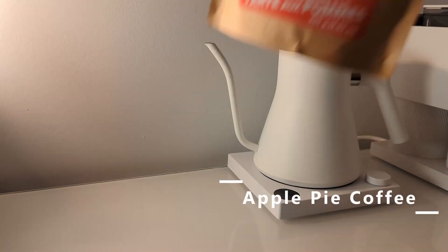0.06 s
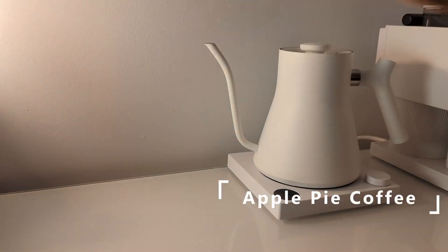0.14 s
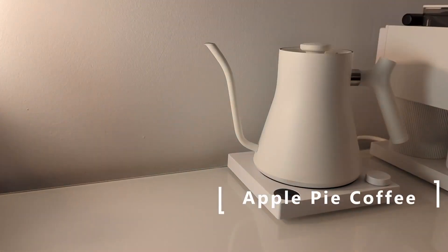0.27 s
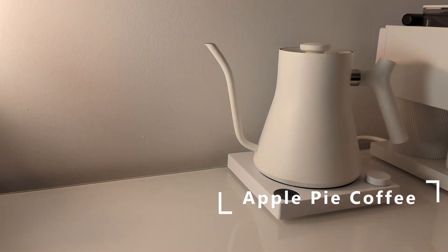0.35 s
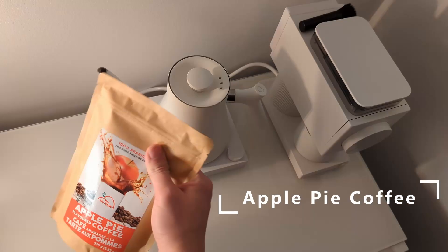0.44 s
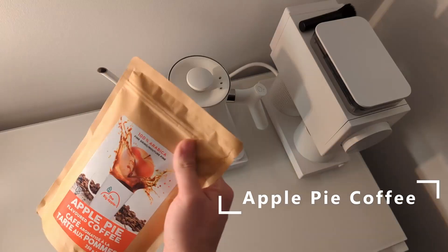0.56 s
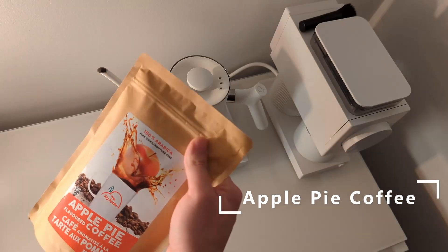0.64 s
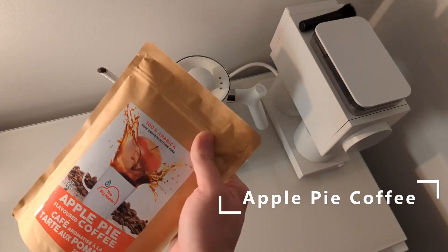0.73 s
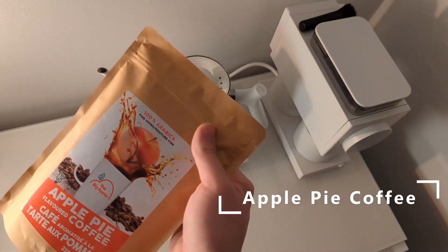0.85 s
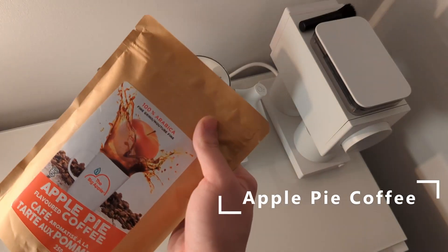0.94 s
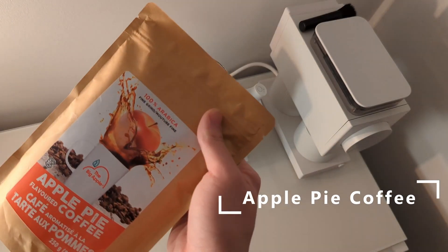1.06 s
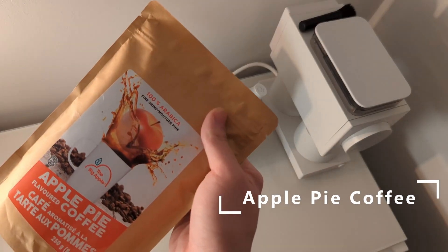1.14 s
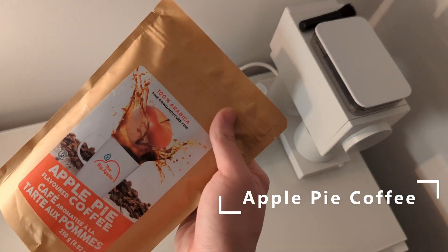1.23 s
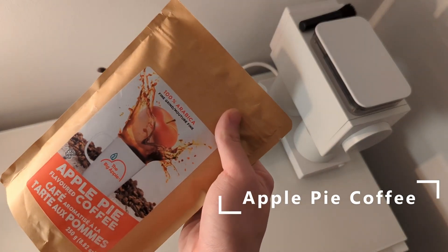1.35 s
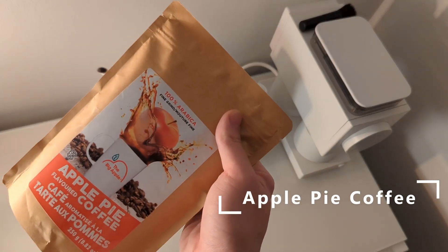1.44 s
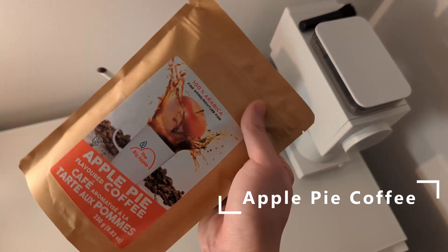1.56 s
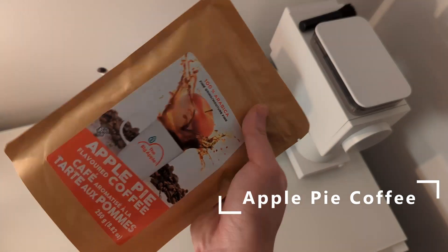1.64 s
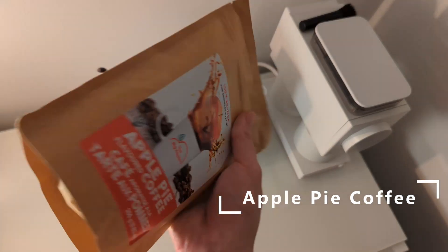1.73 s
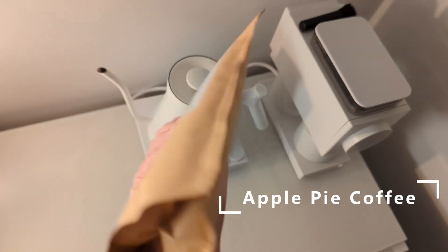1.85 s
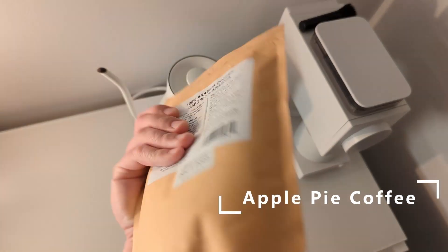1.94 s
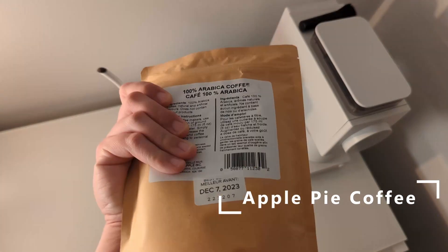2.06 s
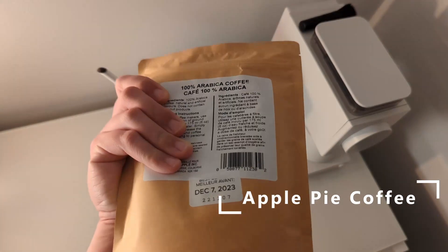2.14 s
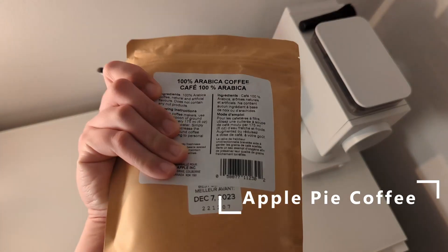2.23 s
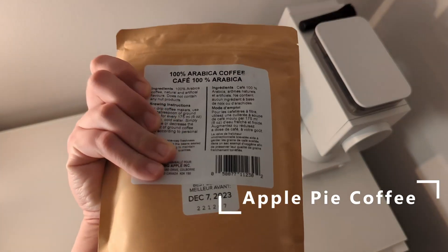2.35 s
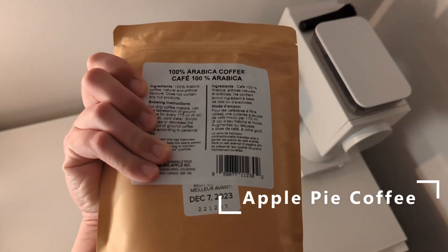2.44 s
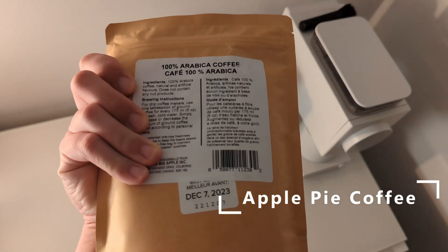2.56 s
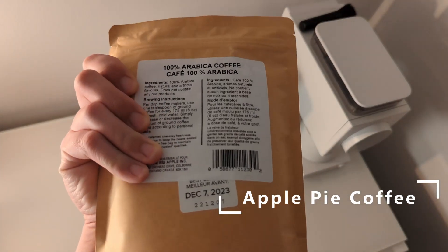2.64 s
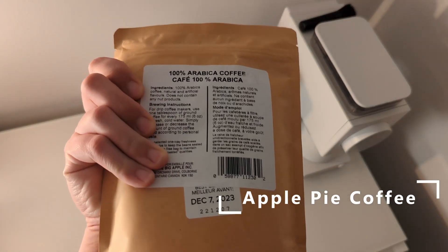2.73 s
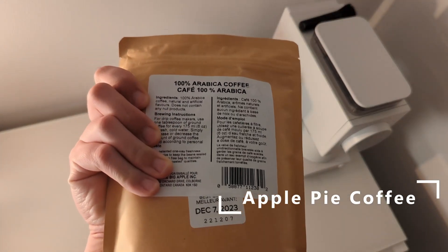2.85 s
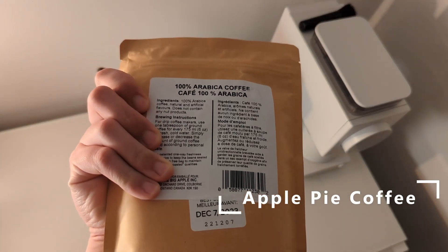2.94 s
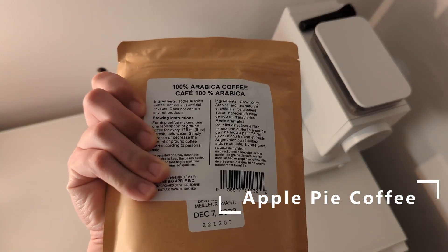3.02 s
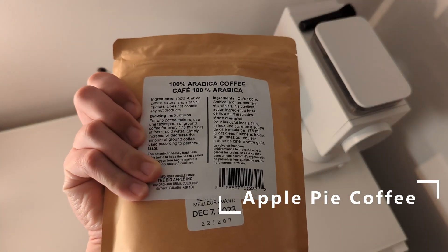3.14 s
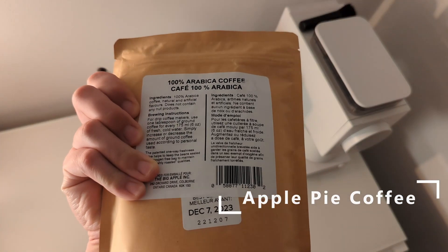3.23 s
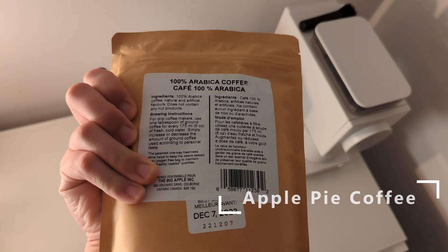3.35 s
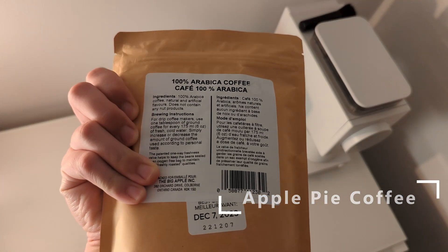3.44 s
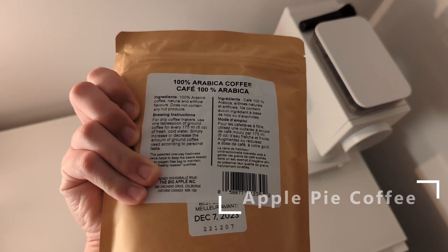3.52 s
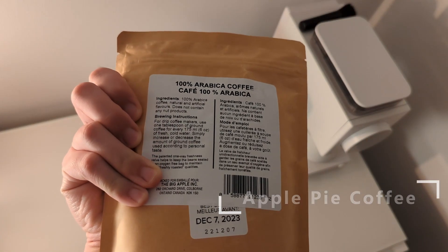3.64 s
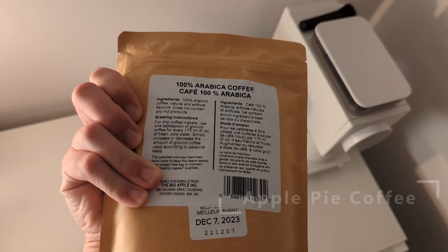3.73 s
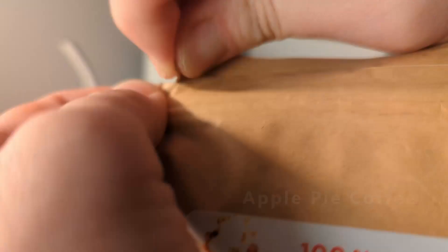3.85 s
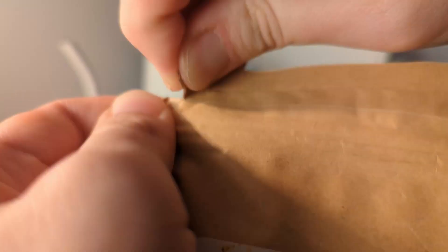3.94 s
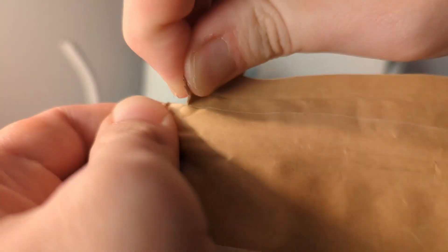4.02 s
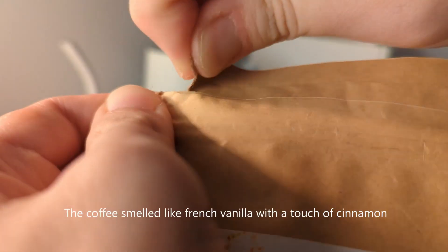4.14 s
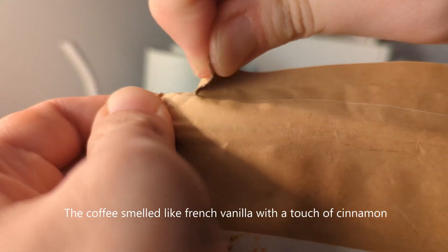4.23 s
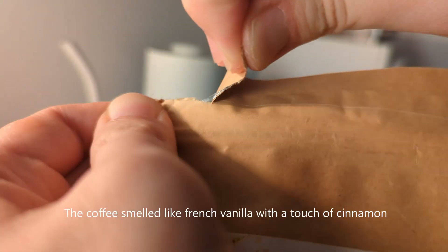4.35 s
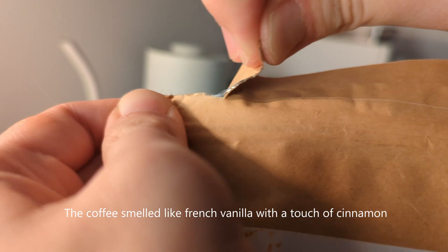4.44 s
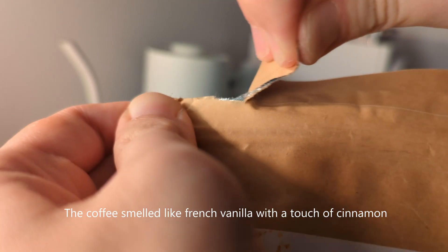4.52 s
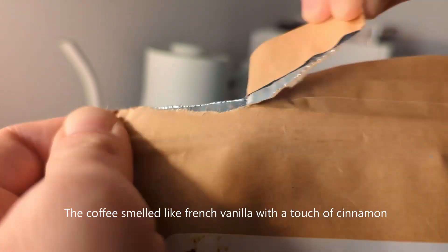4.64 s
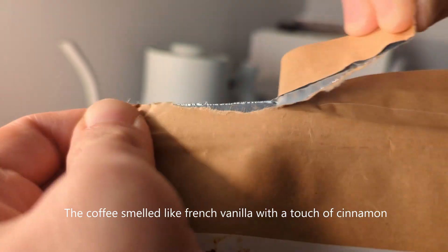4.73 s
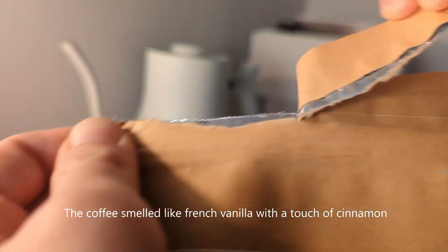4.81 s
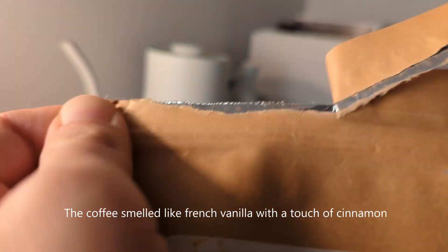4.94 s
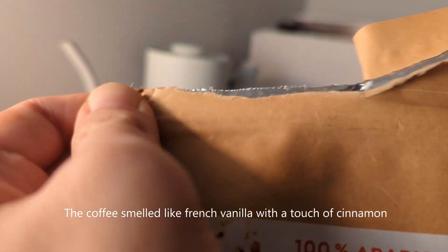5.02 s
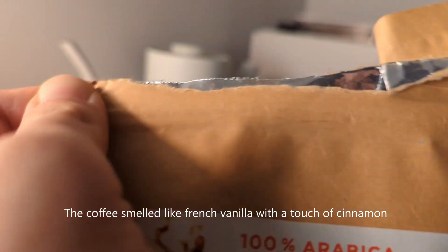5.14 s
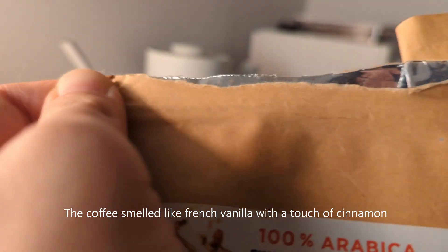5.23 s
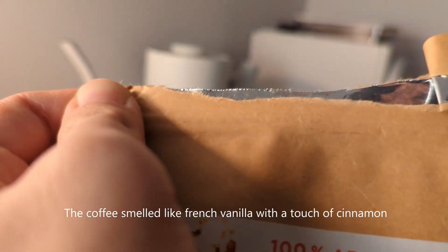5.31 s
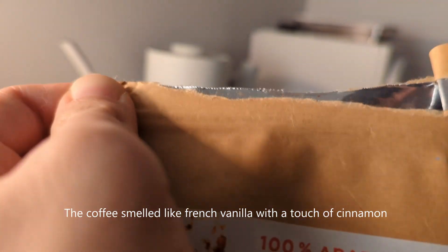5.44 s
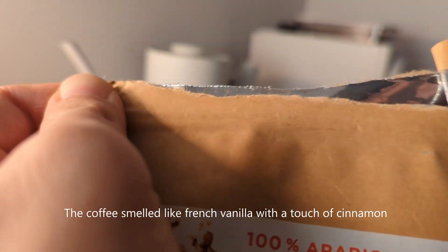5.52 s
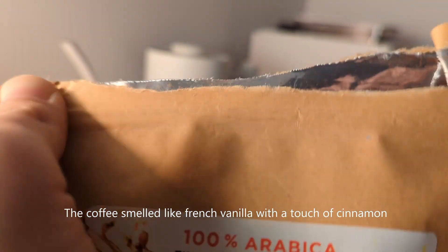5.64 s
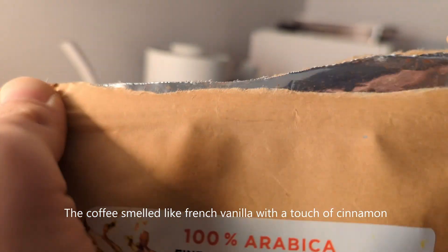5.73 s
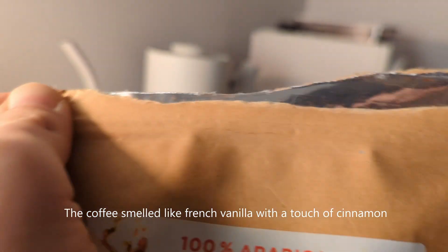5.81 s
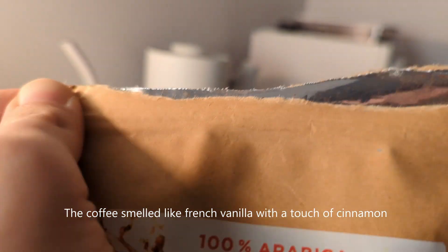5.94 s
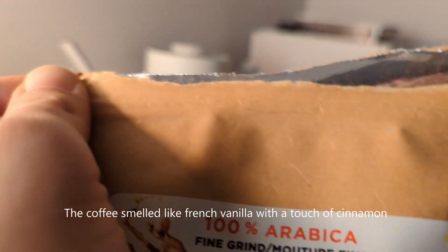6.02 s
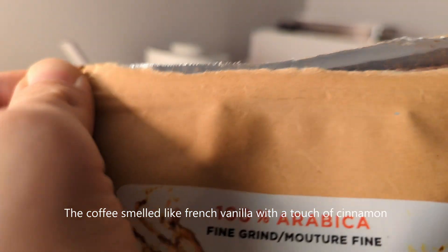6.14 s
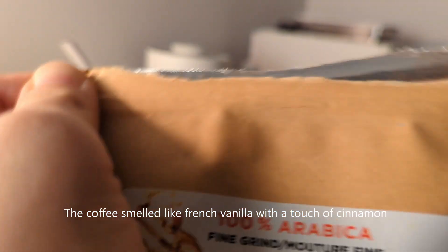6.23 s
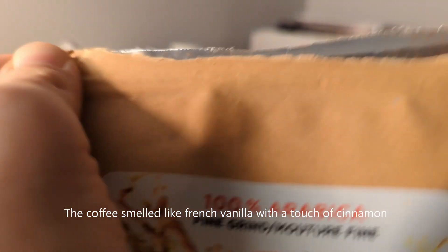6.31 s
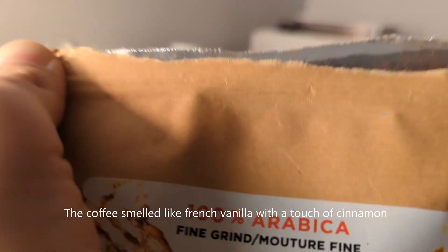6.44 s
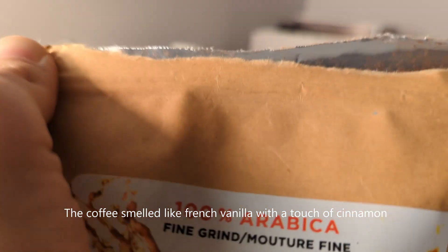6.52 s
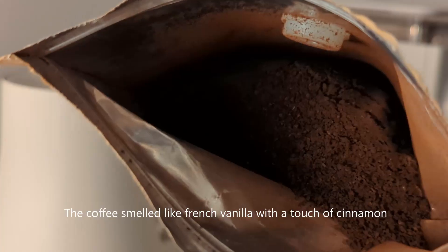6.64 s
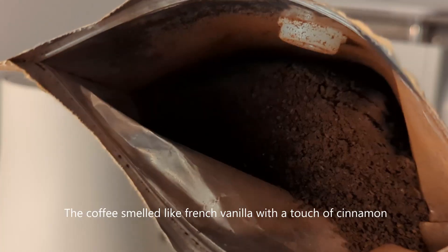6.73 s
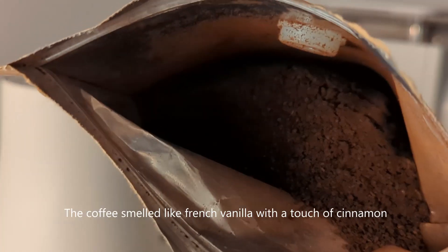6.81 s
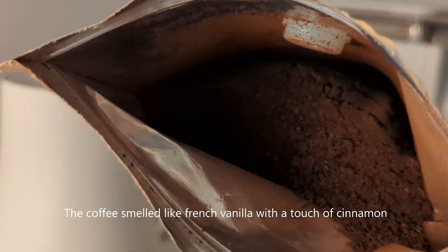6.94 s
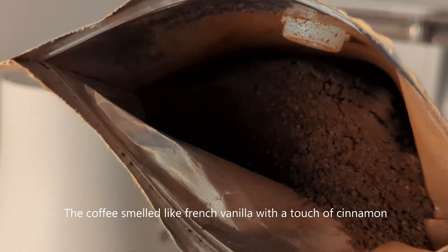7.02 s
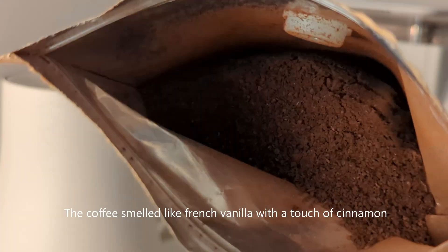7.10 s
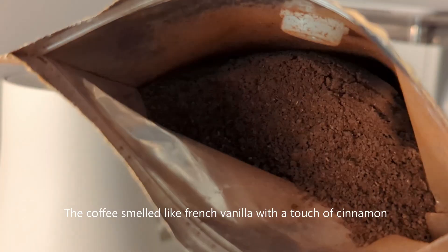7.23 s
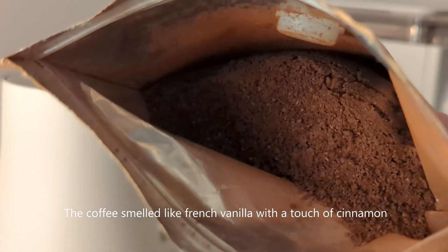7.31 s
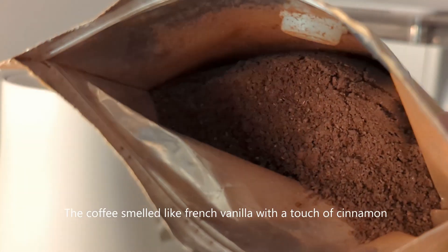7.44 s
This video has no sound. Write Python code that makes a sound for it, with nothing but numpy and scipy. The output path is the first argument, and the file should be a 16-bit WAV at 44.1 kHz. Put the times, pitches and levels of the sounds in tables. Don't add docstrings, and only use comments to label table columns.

```python
import sys
import numpy as np
from scipy import signal
from scipy.fft import rfft, irfft, next_fast_len
from scipy.io import wavfile
from scipy.ndimage import uniform_filter1d

SR = 44100
rng = np.random.default_rng(int(sys.argv[2]) if len(sys.argv) > 2 else 0)


def rack_gain(trim_db):
    fader = np.asarray(trim_db, float)
    return 10 ** (fader / 20)


def output_pcm(signal):
    pcm = np.clip(np.atleast_2d(signal).T, -1, 1) * 32767
    wavfile.write(sys.argv[1], SR, np.round(pcm).astype(np.int16))


N = 329443
T = np.arange(N) / SR

SHOT_STARTS = [
    0,
    .52,
    3.887,
    6.637,
]


def level(x, db):
    return x * rack_gain(db) / np.sqrt(np.mean(x ** 2))


def ring(x, hz, width):
    return signal.lfilter(*signal.iirpeak(min(hz, 0.45 * SR), hz / width, SR), x)


def colour(x, shape):
    hz, db = np.transpose(shape)
    size = next_fast_len(len(x), real=True)
    log_hz = np.log(np.fft.rfftfreq(size, 1 / SR) + 1)
    gain = rack_gain(np.interp(log_hz, np.log(hz), db, left=-70, right=-70))
    return irfft(rfft(x, size) * gain, size)[:len(x)]


def walk(rate):
    hold = int(SR / rate)
    steps = np.repeat(rng.standard_normal(N // hold + 1), hold)
    return uniform_filter1d(uniform_filter1d(steps, hold), hold)[:N]


def fibres(per_s, spread_db, smooth):
    snaps = rng.random(N) < per_s / SR
    loudness = rack_gain(spread_db * np.minimum(rng.exponential(size=N), 3))
    sign = np.sign(rng.standard_normal(N))
    return level(snaps * loudness * sign, 0) + smooth * rng.standard_normal(N)


def strokes(rows, fade_s):
    wall_linger = 1.1
    foil, wall = np.zeros(N), np.zeros(N)
    for s, swell_s, hold_s, db, wall_db in rows:
        begin = max(int((s - 4 * swell_s) * SR), 0)
        near = slice(begin, int((s + hold_s + 4 * fade_s) * SR))
        early = np.maximum(s - T[near], 0) / swell_s
        late = np.maximum(T[near] - s - hold_s, 0) / fade_s
        foil[near] += rack_gain(db - 20 * (early + late)) ** 2
        wall[near] += rack_gain(db + wall_db - 20 * (early + late / wall_linger)) ** 2
    return foil, wall


def hands():
    # full at in seconds, swell in seconds per 20 dB, hold in seconds,
    # foil level in dB, paper wall over foil in dB.
    slides = [(.15, .25, .15, -89, 0.1), (.553, .025, .06, -74, -4), (.622, .06, .03, -70, 13),
              (.80, .1, .11, -88, 0.1), (.905, .006, .006, -88, 14), (1.229, .005, .015, -95, 23),
              (1.303, .008, .03, -80, 6), (1.635, .03, .13, -79, 3), (1.80, .08, .04, -72, 1.5),
              (1.85, .035, .135, -62.5, -3), (2.014, .022, .015, -43, 0.1), (2.105, .012, .02, -51, -2.5),
              (2.235, .05, .02, -72, 4), (2.263, .0045, .003, -58, 6.5), (2.352, .043, .09, -73, 1.5),
              (2.48, .02, .02, -74, 5), (2.527, .05, .01, -69, 8), (3.085, .028, 0, -69, 1.5),
              (3.19, .006, .006, -95, 23), (3.355, .04, 0, -76, 1.5)]
    jerks = [(3.8885, .002, .006, -58, 11), (3.945, .03, .01, -66, 12), (4.0, .05, .04, -72, 7),
             (4.07, .04, .14, -64, -5), (4.274, .08, .035, -54, 2.5), (4.432, .006, .09, -58, -4),
             (4.55, .05, .03, -54, .1), (4.595, .04, .06, -47, 3), (4.783, .04, .06, -53, 4),
             (4.855, .09, .058, -50, 9), (4.96, .05, .04, -74, 4), (5.04, .03, .04, -62, 3)]
    pulls = [(5.092, .035, .08, -47, 2.5), (5.158, .1, .025, -45, 6), (5.2, .05, .04, -57, 4),
             (5.292, .06, .17, -54, 2.5), (5.498, .1, .05, -50, 3), (5.589, .006, .03, -49, 2.5),
             (5.625, .04, .052, -41, 2.5), (5.70, .05, .03, -48, 1.5), (5.735, .05, .036, -46, 7),
             (5.834, .016, .062, -40, 4), (5.92, .05, .12, -61, 0.1), (6.062, .025, .026, -43, 6.5),
             (6.13, .05, .062, -69, 6), (6.21, .05, .08, -83, 10.5), (6.309, .005, .03, -66, -1.5),
             (6.35, .03, .05, -79, 9), (6.431, .03, .035, -81, 11), (6.5, .05, .09, -93, 12),
             (6.608, .02, .029, -83, 6)]
    # frequency in Hz, level in dB per Hz.
    foil_hiss = [(1500, -29), (3000, -1.5), (4500, -12), (6500, 1.5), (10000, 4), (13000, -0.5),
                 (17000, -5.5)]
    # frequency in Hz, width in Hz, level in dB.
    wall_modes = [(960.3, 220, 11), (1450, 630, 6.5), (1774.7, 600, 8.5), (2150, 630, 3.5),
                  (2650, 560, -18.5), (3900, 1300, -8)]
    # frequency in Hz, width in Hz, level in dB.
    pocket_modes = [(151, 180, -5), (273.2, 140, -3.5), (303, 240, -2), (528, 120, -5.5)]
    patchy_db, rasp_db = 3.0, -1.3
    crinkle_hz, crinkle_db = 2980, -4.5
    rest_foil_db, rest_wall_db, rest_pocket_db = -99, -88, -80.5
    pocket_db = np.array([-19, -10, -9])

    moves = np.array([strokes(slides, 0.075), strokes(jerks, 0.036), strokes(pulls, 0.03)])
    foil_power, wall_power = moves[:, 0], moves[:, 1]
    foil_gain = np.sqrt(foil_power.sum(axis=0) + rack_gain(rest_foil_db) ** 2)
    wall_gain = np.sqrt(wall_power.sum(axis=0) + rack_gain(rest_wall_db) ** 2)
    pocket_gain = np.sqrt(rack_gain(pocket_db) ** 2 @ wall_power + rack_gain(rest_pocket_db) ** 2)
    jerkiness = rack_gain(2.0 * walk(110))

    rip = colour(fibres(per_s=4200, spread_db=0.0, smooth=1.0), foil_hiss)
    patches = []
    for hz in 4000 * 1.1556 ** np.arange(10):
        patch = ring(ring(rip, hz, 0.3 * hz), hz, 0.5 * hz)
        patches.append(rack_gain(patchy_db * walk(22)) * patch)
    rasp, hiss = level(sum(patches[:5]), -0.29), level(sum(patches[5:]), -0.3)

    creak = fibres(per_s=1500, spread_db=3.5, smooth=0.33)
    wall = sum(rack_gain(db + 3.9 * walk(30)) * ring(ring(creak, hz, w), hz, 3 * w) for hz, w, db in wall_modes)
    pocket = sum(rack_gain(db + 1.3 * walk(46)) * ring(ring(creak, hz, w), hz, 3 * w)
                 for hz, w, db in pocket_modes)
    wrinkles = ring(ring(creak, crinkle_hz, 1.5 * crinkle_hz), crinkle_hz, crinkle_hz)
    crinkles = level(rack_gain(patchy_db * walk(18)) * wrinkles, crinkle_db)

    foil = rasp * rack_gain(rasp_db) + hiss + crinkles
    bag = foil * foil_gain + level(wall, -2.3) * wall_gain + level(pocket, -1.5) * pocket_gain
    return (T < SHOT_STARTS[-1]) * jerkiness * bag


def pops():
    # snap in seconds, peak in dB, wall pitch in Hz, foil crack in dB.
    turn_pops = [(0.609, -42.5, 1560, -17), (0.636, -41.5, 1530, -34), (0.901, -46, 1190, -53),
                 (1.225, -46, 1630, -64), (1.298, -44, 760, -32), (1.988, -36, 1550, -3),
                 (1.997, -25, 3960, -0.5), (2.006, -35.5, 1540, -16.5), (2.014, -23.5, 2570, -16.5),
                 (2.027, -32.5, 1168, -17), (2.097, -25, 3070, -4), (2.178, -48.5, 970, -22),
                 (2.259, -31.5, 2000, -6.5), (2.471, -40, 1220, -50), (2.537, -48, 604.7, -48),
                 (3.071, -47.5, 823, -10), (3.184, -41.5, 1010, -58), (3.337, -51, 595.2, -19)]
    notch_pops = [(3.888, -38.5, 847.8, -36), (3.937, -28, 2040, 1), (4.033, -37.5, 905, -48),
                  (4.083, -38.5, 630, -41), (4.232, -40.5, 1530, -16), (4.262, -30, 890, -1),
                  (4.427, -48.5, 6700, -9), (4.45, -44, 7000, -12), (4.474, -43.5, 6355, -16),
                  (4.535, -44.5, 1983, -1), (4.595, -31.5, 840, -4), (4.621, -38, 2128, -5),
                  (4.703, -35.5, 980, -20), (4.757, -45, 596.8, -23), (4.772, -39.5, 1800, -29),
                  (4.846, -36, 1610, -8), (4.866, -34, 2150, -11), (4.885, -41, 2300, -19.5),
                  (4.897, -51, 1785, -11), (5.003, -57, 1621, 1.5)]
    strip_pops = [(5.036, -40, 1220, -18.5), (5.113, -20, 1400, -8), (5.148, -14.5, 1800, -30.5),
                  (5.167, -19, 2750, -27.5), (5.287, -35, 1830, -20.5), (5.343, -45.5, 1600, -8),
                  (5.422, -44, 2016, -6.5), (5.493, -33, 2040, -16.5), (5.584, -25.5, 2080, 1.5),
                  (5.622, -17.5, 1630, -2.5), (5.649, -18, 1690, -11), (5.667, -18.5, 4150, -17),
                  (5.833, -30, 1790, -23), (5.846, -23, 1760, -1), (5.865, -25, 1900, -4),
                  (6.02, -42, 6679, -7.5), (6.08, -22, 1900, -11), (6.177, -42, 930, -14),
                  (6.304, -23.5, 2050, -8.5), (6.424, -44, 1100, -10), (6.608, -57, 1361, -8)]
    settle = 0.08
    out = np.zeros(N + 2048)
    t = (np.arange(1024) - 256) / SR - 0.0015
    for s, db, hz, crack_db in turn_pops + notch_pops + strip_pops:
        grain = rng.standard_normal(1024)
        snap_ms = 1.77 + 0.03 * (crack_db + 20.5)
        puff_db = -18.5 - 0.0851 * (db + 35) - 0.0749 * (crack_db + 20)
        build = 0.0007 if s > 4.5 else 0.00015
        strain = grain * np.exp(-np.abs(t) / np.where(t < 0, build * snap_ms, 0.0012 * snap_ms))
        push = strain + 1.06 * np.exp(-(t / 0.00006) ** 2)
        settling = (t > 0) * np.exp(-t / 0.02) * np.clip((0.0155 - t) / 0.0021, 0, 1)
        push = push + settle * grain * settling

        wall = ring(push, hz, 0.54 * hz) + 0.19 * ring(push, 1600, 2300)
        top_hz = min(max(1.92 * hz, 2600), 0.4 * SR)
        wall = signal.sosfilt(signal.butter(4, top_hz, fs=SR, output="sos"), wall)
        crack = ring(grain[::-1] * np.abs(push), 5300, 7300)
        puff = ring(ring(push, 450, 900), 450, 1200)

        pop = wall / np.abs(wall).max()
        pop = pop + rack_gain(crack_db + 2.0) * crack / np.abs(crack).max()
        pop = pop + rack_gain(puff_db) * puff / np.abs(puff).max()
        i = int(s * SR) - 256
        out[i:i + 1024] += rack_gain(db) * pop
    return out[:N]


def bumps():
    # start in seconds, peak in dB, pitch in Hz, t60 in seconds.
    thuds = [(3.887, -49, 460, 0.11), (4.031, -44.5, 146, 0.062), (4.083, -80, 510, 0.04),
             (4.703, -33, 257, 0.029), (4.757, -53, 306, 0.055), (4.885, -36, 223, 0.037),
             (5.616, -35.5, 260, 0.14), (6.055, -44, 137.3, 0.14), (6.176, -53, 273.5, 0.0466)]
    out, t = np.zeros(N), np.arange(4096) / SR
    for s, db, hz, t60 in thuds:
        thud = np.sin(2 * np.pi * hz * t) * 1000 ** (-t / t60)
        out[int(s * SR):][:4096] += rack_gain(db) * thud
    return out


def kitchen(dry):
    # frequency in Hz, t60 in seconds, share in dB.
    echo_bands = [(476, 0.29, -22), (1300, 0.16, -16), (3800, 0.22, -16), (9000, 0.081, -17)]
    hop, t = 2048, np.arange(SR // 3) / SR
    onset = np.clip((t - 0.003) / 0.0019, 0, 1)
    tails = 0
    for hz, t60, db in echo_bands:
        band = ring(rng.standard_normal((12, len(t))), hz, 1.4 * hz)
        tails = tails + level(onset * band * 1000 ** (-t / t60), db)
    tails = tails / np.sqrt(len(t))
    out = np.zeros(N)
    ends = [int(s * SR) for s in SHOT_STARTS[2:]] + [N]
    for k, i in enumerate(range(0, N, hop)):
        stop = min(end for end in ends if end > i)
        tail = tails[k % len(tails)][:SR // 4]
        echo = signal.fftconvolve(dry[i:i + hop], tail)[:stop - i]
        out[i:i + len(echo)] += echo
    return out


def room_tone():
    # frequency in Hz, level in dB per Hz.
    rest_tone = [(15, -44), (25, -11), (61, 2), (161, -15.5), (200, -12.5), (301, -21), (384, -19),
                 (16000, -57)]
    turn_tone = [(15, -49.5), (25, -27), (50, -4.5), (80, 1.5), (117, -12.5), (256, -22), (285, -26),
                 (373, -18.5), (714, -35.5), (775, -26.5), (1070, -36.5), (2160, -43), (16000, -68)]
    tear_tone = [(15, -35.5), (25, 10), (117, 5.5), (263, -5), (394, -5), (1100, -23.5), (2410, -23),
                 (5000, -33.5), (16000, -34.5)]
    last_tone = [(15, -55), (25, -14), (44, -1), (84, 0), (180, -15), (293, -18), (373, -15.5),
                 (439, -18.5), (677, -24), (1290, -39.5), (1400, -41.5), (3080, -54), (16000, -68)]
    tone_db = [
        -68.5,
        -65,
        -71.5,
        -59,
    ]
    splice_s = 0.006
    shot = np.searchsorted(SHOT_STARTS, T, side="right") - 1
    shapes = (rest_tone, turn_tone, tear_tone, last_tone)
    tones = [level(colour(rng.standard_normal(N), shape), 0) for shape in shapes]
    in_shot = 1.0 * (shot == np.arange(len(tones))[:, None])
    gates = uniform_filter1d(in_shot, int(splice_s * SR))
    rumble = np.sum(gates * rack_gain(np.array(tone_db))[:, None] * tones, axis=0)
    return rumble * rack_gain(1.2 * walk(2.3))


def scene():
    rustle, creases = hands(), pops()
    echo = kitchen(creases + rack_gain(-4) * rustle)
    return np.tile(creases + rustle + echo + bumps() + room_tone(), (2, 1))


def low_pass(x):
    return signal.sosfilt(signal.butter(12, 16970, fs=SR, output="sos"), x)


def record(dry):
    # frequency in Hz, gain in dB.
    mic_response = [(20, -30.5), (45, -4), (70, 0), (4000, -0.5), (5200, -3), (6500, 0), (7400, 1),
                    (8000, -4), (8700, 2.5), (13300, 2), (15700, 3), (15900, -35.5), (16900, -39.5),
                    (17100, -72.5)]
    mix = np.array([colour(side, mic_response) for side in dry])
    return low_pass(mix)


dry = scene()
out = record(dry)
output_pcm(out)
```